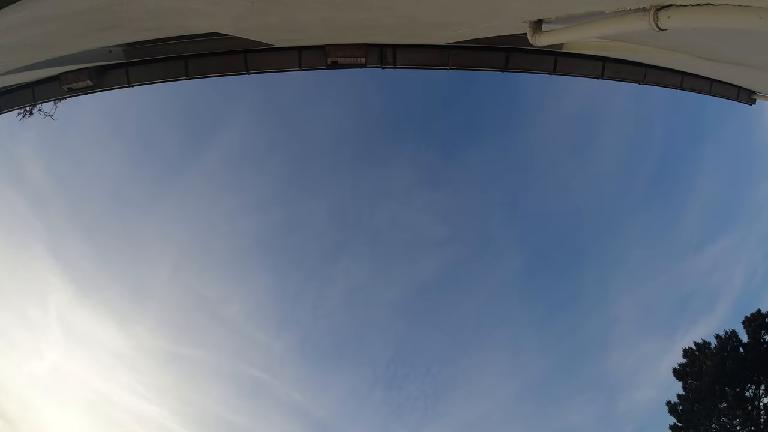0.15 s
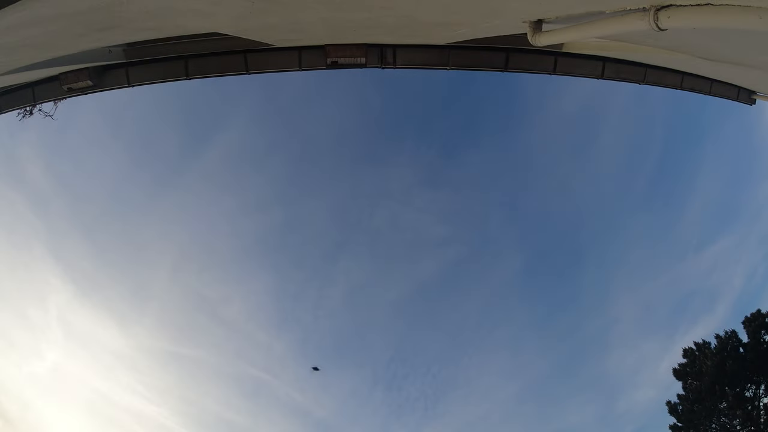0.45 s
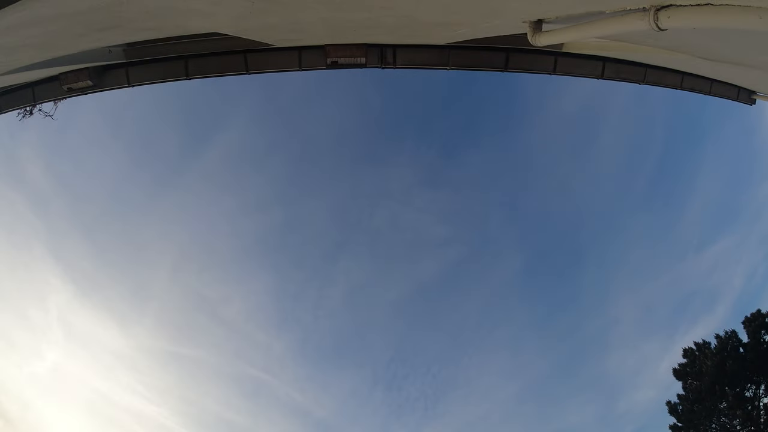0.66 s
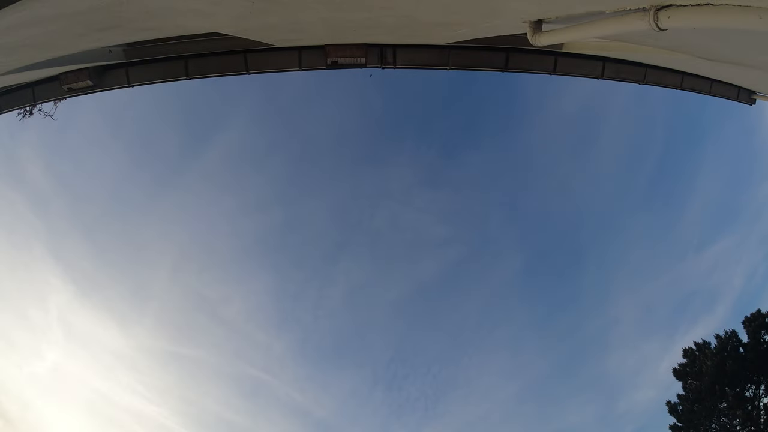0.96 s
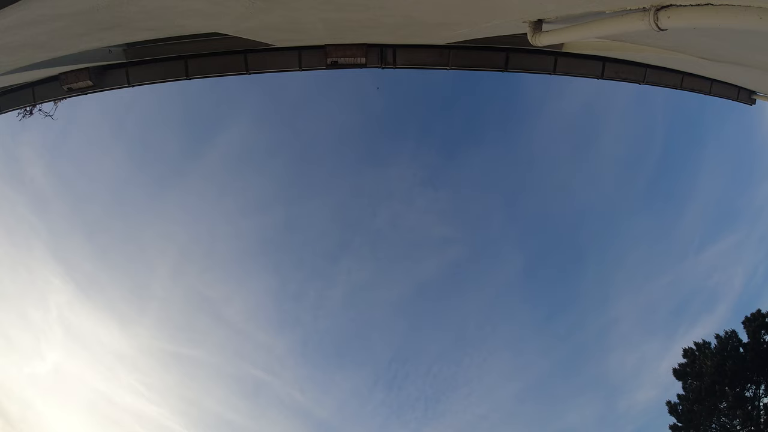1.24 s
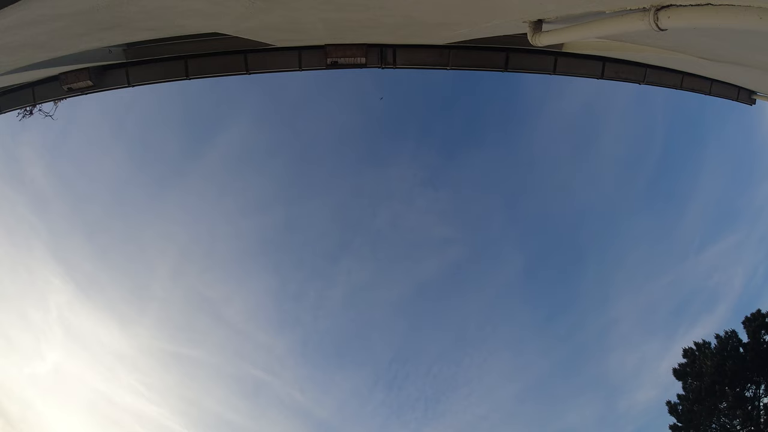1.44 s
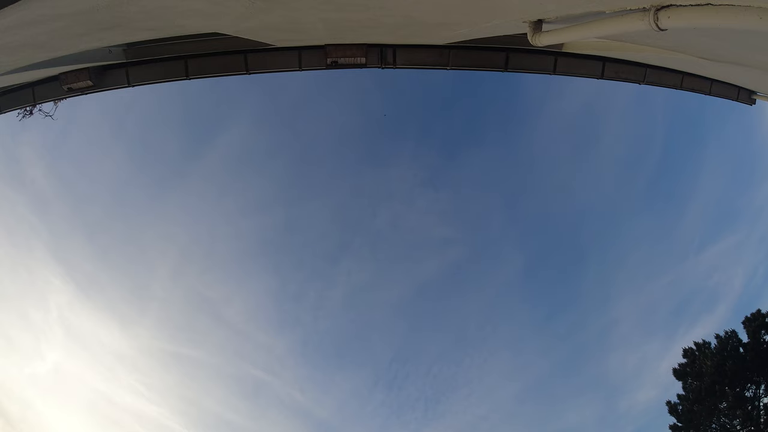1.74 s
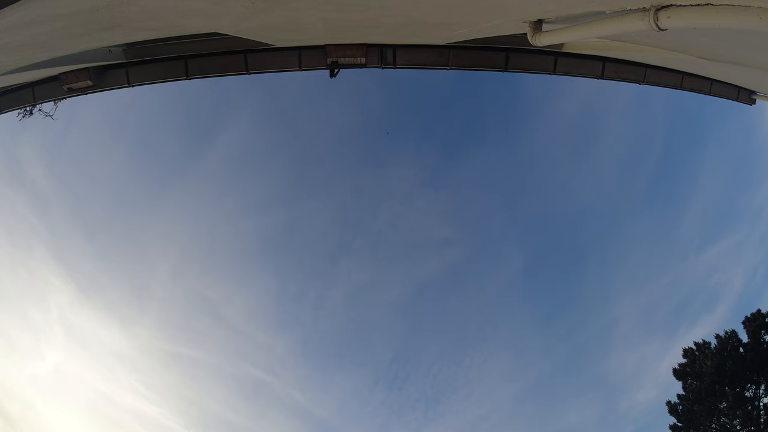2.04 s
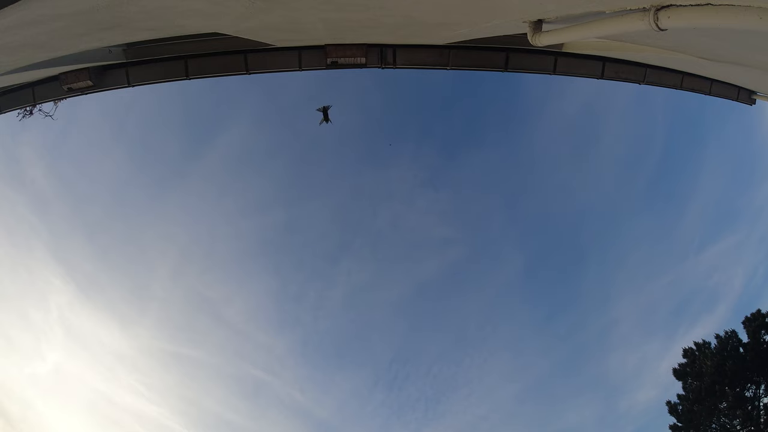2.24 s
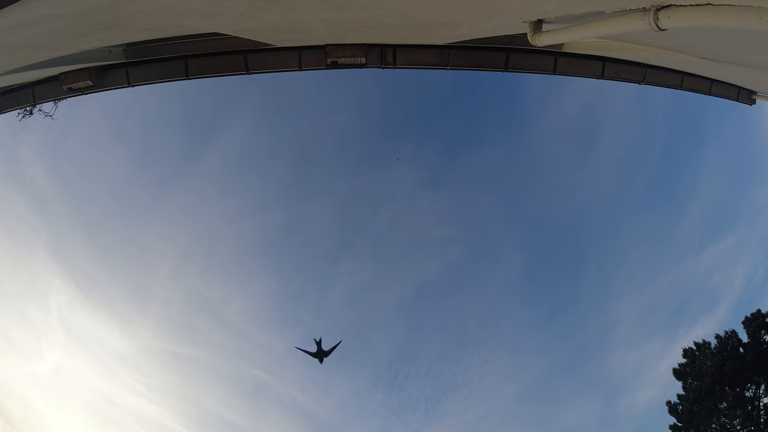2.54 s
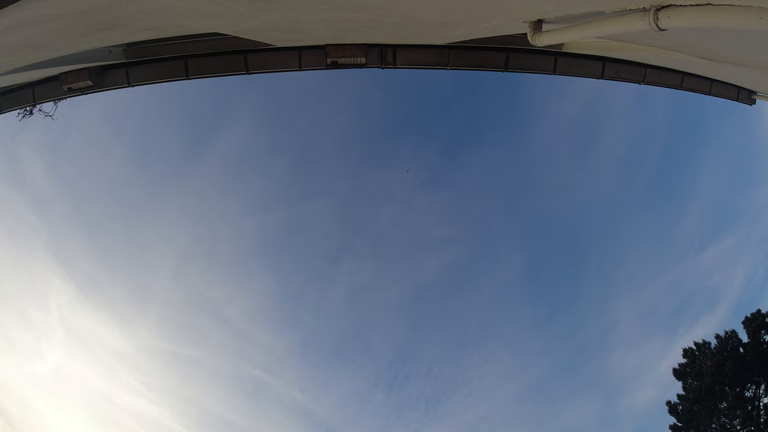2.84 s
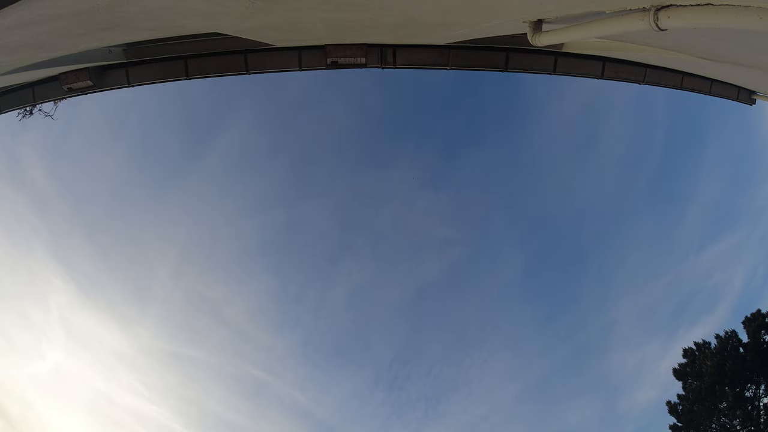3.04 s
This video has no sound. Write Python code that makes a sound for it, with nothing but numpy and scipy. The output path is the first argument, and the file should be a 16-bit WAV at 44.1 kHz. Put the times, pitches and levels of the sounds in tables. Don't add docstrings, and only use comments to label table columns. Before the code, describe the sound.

Small birds whistle, chirp and give thin calls in a quiet yard over faint distant rumble.

```python
import sys
import numpy as np
from scipy import signal
from scipy.fft import rfft, irfft, next_fast_len
from scipy.io import wavfile
from scipy.ndimage import uniform_filter1d

SR = 44100
rng = np.random.default_rng(int(sys.argv[2]) if len(sys.argv) > 2 else 0)


def voltage_ratio(level):
    return 10 ** (np.asarray(level, float) / 20)


def pcm_store(signal):
    levels = np.round(np.clip(np.atleast_2d(signal), -1, 1) * 32767)
    wavfile.write(sys.argv[1], SR, levels.astype(np.int16).T)


N = 140679


def rms_one(x):
    return x / np.sqrt(np.mean(x ** 2) + 1e-20)


def at_hz(points, hz):
    table = np.array(points)
    return np.interp(np.log(hz), np.log(table[:, 0]), table[:, 1])


def drift(rate):
    r = np.exp(-2 * np.pi * rate / SR)
    return rms_one(signal.lfilter([1], [1, -2 * r, r * r], rng.standard_normal(N + SR))[SR:])


def clock():
    return np.arange(N) / SR


def whistle(start, stop, pitch, level):
    edge_s = .004
    t = clock()
    edge = np.clip(np.minimum(t - start, stop - t) / edge_s + .5, 0, 1)
    phase = 2 * np.pi * np.cumsum(pitch) / SR
    return np.sqrt(2) * edge ** 2 * level * np.sin(phase)


def slur(rows, shift=0, add_db=0):
    s, hz, db = np.transpose(rows)
    t = clock() - shift
    level = voltage_ratio(np.interp(t, s, db) + add_db)
    return whistle(s[0] + shift, s[-1] + shift, np.interp(t, s, hz), level)


def glides(rows):
    return sum(slur([(s, first, db), (s + d, last, db)]) for s, d, first, last, db in rows)


def puffs(rows, width_s, low_hz, high_hz):
    noise = rng.standard_normal((3, N))
    band = signal.butter(4, [low_hz, high_hz], "band", fs=SR, output="sos")
    noise = signal.sosfilt(band, noise[0] + noise[1:])
    bells = sum(voltage_ratio(db) * np.exp(-.5 * ((clock() - s) / width_s) ** 2) for s, db in rows)
    return rms_one(noise) * bells


def air(spectrum, low_hz, high_hz, patchy_db):
    # f/Hz, correlation/1
    likeness = [(60, 0.98), (120, 0.91), (220, 0.85), (450, 0.79), (800, 0.4), (1500, 0.5), (3000, .05),
                (8000, 0.65)]
    out, together = 0, drift(2.8)
    edges = np.geomspace(low_hz, high_hz, int(2 * np.log2(high_hz / low_hz)) + 2)
    white = rng.standard_normal((2, 2, N + SR // 4))
    for k, (low, high) in enumerate(zip(edges, edges[1:])):
        band = signal.butter(2, [low, high], "band", fs=SR, output="sos")
        mid, side = signal.sosfilt(band, white[k % 2])[:, -N:]
        hz = np.sqrt(low * high)
        alike = at_hz(likeness, hz)
        gain = voltage_ratio(at_hz(spectrum, hz) + patchy_db * (together + drift(17)))
        out = out + gain * (np.sqrt(1 + alike) * mid + np.sqrt(1 - alike) * side * [[1], [-1]])
    return rms_one(out)


def traffic_rumble():
    # f/Hz, level/dB per Hz
    rumble = [(18, -30), (30, 5.5), (49, -2), (71, -15.5), (106, -14), (173, -20), (436, -25.5), (538, -41),
              (700, -10.5), (910, -60), (1540, -120)]
    return voltage_ratio(-53.5) * air(rumble, 31, 700, patchy_db=.4)


def breeze():
    # f/Hz, level/dB per Hz
    hiss = [(700, -4.5), (1300, -9), (2500, -11), (4000, -14), (5500, -21.5), (7500, -27), (10000, -39),
            (16000, -40.5)]
    # t/s, level/dB
    freshening = [
        (0, -2.5),
        (1.2, 0),
        (1.599, 1.2),
        (3.19, 0.95),
    ]
    level = voltage_ratio(-68.5 + np.interp(clock(), *np.transpose(freshening)))
    return level * air(hiss, 700, 16000, patchy_db=.3)


def drones():
    # f/Hz, rms level/dB
    engines = [(38, -60), (50, -62.5), (74, -64.5), (100, -64)]
    out = 0
    for hz, db in engines:
        level = voltage_ratio(db + 2.9 * drift(4.5))
        phase = 2 * np.pi * np.cumsum(hz + 5 * drift(3.945)) / SR
        out = out + np.sqrt(2) * level * np.sin(phase)
    return out


def cries():
    # t/s, lead-in level/dB, buzz level/dB, buzz length/s
    calls = [
        (-.012, -42, -44, 0.068),
        (1.968, -43, -44, 0.085),
    ]
    lead_s, lead_hz, lead_low_db = .03, 4000, -8
    buzz_hz, start_hz, climb_s, overtone_db = 3004, 2200, 0.00802, -27
    beat_hz, swing_hz, throb_db, fade_db_per_s = 95, 260, 0.5, 98
    upper_hz, upper_db = 470, -3
    t, out = clock(), 0
    wander_hz = 150 * drift(180)
    rough = voltage_ratio(2.5 * drift(200))
    for s, lead_db, buzz_db, d in calls:
        b = s + lead_s
        out = out + whistle(s, b, lead_hz + 0 * t, voltage_ratio(lead_db))
        out = out + whistle(s, b, lead_hz / 2 + wander_hz, rough * voltage_ratio(lead_db + lead_low_db))
        left = np.exp(-np.clip(t - b, 0, 1) / climb_s)
        beat = np.cos(2 * np.pi * beat_hz * (t - b))
        steady = buzz_hz + (start_hz - buzz_hz) * left
        pitch = steady + wander_hz + swing_hz * beat
        fade_db = fade_db_per_s * np.clip(t - b - d / 2, 0, 1)
        level = rough * voltage_ratio(buzz_db - 10.0 * left - fade_db)
        out = out + whistle(b, b + d, pitch, level * voltage_ratio(throb_db * beat))
        out = out + whistle(b, b + d, steady + upper_hz, level * voltage_ratio(upper_db))
        out = out + whistle(b, b + d, 2 * pitch, level * voltage_ratio(overtone_db))
    return out


def peeps():
    # t/s, length/s, first f/Hz, last f/Hz, level/dB
    short_calls = [(2.725, .02, 5900, 5300, -62), (2.716, .02, 4100, 3700, -50),
                   (2.745, .022, 3700, 3950, -52), (2.795, .03, 4100, 4000, -56),
                   (2.74, .015, 6800, 6200, -70), (0, .01, 5000, 4500, -44), (.012, .012, 5300, 4300, -50),
                   (.028, .012, 5200, 4000, -52), (2.7, .014, 4600, 5100, -53),
                   (2.893, .006, 3400, 2200, -62), (.092, .025, 3400, 3300, -49)]
    return glides(short_calls)


def singer():
    # t/s, f/Hz, level/dB
    dip = [(0.78, 2030, -68), (0.796, 1920, -52), (0.816, 1620, -52.5), (0.87, 1456, -58),
           (0.928, 1668, -52), (0.948, 1685, -46), (0.984, 1736, -48.5), (1.0, 1754, -57.5)]
    rise = [(1.09, 1804, -64), (1.128, 1830, -45.5), (1.141, 1843, -55.5), (1.15, 1870, -50),
            (1.184, 1898, -52.5), (1.194, 1962, -59.5), (1.24, 2086, -50), (1.286, 2190, -54.5),
            (1.294, 2195, -41), (1.361, 2298, -42), (1.419, 2318, -38), (1.431, 2320, -61.5)]
    lift = [
        (1.909, 1710, -67),
        (1.924, 1781, -56),
        (1.951, 1912, -59.5),
        (1.994, 2060, -43.5),
    ]
    hook = [
        (2.005, 1869, -75),
        (2.011, 1776, -47),
        (2.032, 1460, -54),
        (2.06, 1450, -49),
        (2.097, 1468, -49),
        (2.109, 1316, -57.5),
    ]
    fall = [(2.155, 2892, -57), (2.163, 2746, -42), (2.191, 2283, -40.5), (2.211, 2165, -39),
            (2.23, 2195, -54), (2.241, 2300, -41), (2.252, 2280, -52), (2.288, 2262, -36.5),
            (2.315, 2227, -50.5)]
    # t/s, f/Hz, level/dB
    arch = [
        (.255, 2850, -72),
        (.3, 3060, -67),
        (.32, 2950, -69),
        (.337, 2350, -73),
    ]
    # t/s, f/Hz, level/dB
    droop = [
        (0.486, 2100, -84),
        (0.513, 2220, -60.5),
        (.55, 2205, -52),
        (0.564, 2085, -60.5),
        (0.583, 1710, -55),
    ]
    # t/s, length/s, first f/Hz, last f/Hz, level/dB
    short_notes = [(.122, .05, 2400, 2000, -54), (.735, .015, 2400, 2600, -66.5),
                   (1.147, 0.046, 5050, 5030, -56.5), (1.41, 0.077, 8150, 8000, -76.5),
                   (2.092, .03, 1950, 1300, -49), (2.135, .04, 1850, 1600, -54),
                   (2.228, .012, 1800, 1800, -54.5), (2.25, 0.0058, 3600, 1300, -49),
                   (1.523, 0.0071, 3500, 3600, -49.5), (1.535, 0.0075, 4300, 4100, -50),
                   (.001, 0.039, 2400, 2700, -54), (1.985, .02, 2300, 2500, -44.5),
                   (.06, .03, 1650, 1600, -62.5), (.04, .03, 2400, 2000, -53)]
    # t/s, centre f/Hz, level/dB, depth of each down-stroke f/Hz
    trill = [
        (1.525, 2885, -54, 800),
        (1.567, 2773, -39, 925),
        (1.597, 2830, -41.5, 516),
        (1.618, 2706, -44.5, 155),
        (1.644, 2350, -43.5, 50),
    ]
    stroke_s, gap_depth = .0135, .9
    out = sum(slur(rows) for rows in (dip, rise, lift, hook, fall, arch, droop))
    out += glides(short_notes)
    s, hz, db, depth_hz = np.transpose(trill)
    t = clock()
    stroke = (t - s[0]) / stroke_s % 1
    depth = np.interp(t, s, depth_hz)
    gap = 1 - gap_depth * depth / depth.max() * np.cos(np.pi * (stroke + 0.016)) ** 2
    pitch = np.interp(t, s, hz) + depth * (.5 - stroke)
    return out + whistle(s[0], s[-1], pitch, gap * voltage_ratio(np.interp(t, s, db)))


def ticks():
    # t/s, peak level/dB
    clicks = [(.002, -63), (1.001, -69), (1.555, -66), (1.811, -64.5), (1.87, -69), (2.108, -51.5),
              (2.43, -69), (2.719, -61)]
    out = np.zeros(N)
    for s, db in clicks:
        out[int(s * SR)] = voltage_ratio(db)
    return signal.sosfilt(signal.butter(2, 8000, "high", fs=SR, output="sos"), out + 1e-18)


def twitter():
    # t/s, length/s, f/Hz, level/dB
    far_notes = [(0.017, 0.043, 7950, -81.5), (1.525, 0.093, 7960, -72), (1.61, 0.056, 5850, -71.5),
                 (2.002, 0.039, 7970, -85.5), (.035, 0.029, 6300, -73), (1.97, .06, 4600, -62.5),
                 (1.96, .08, 5700, -70.5), (1.72, 0.034, 4750, -64), (1.45, 0.057, 2800, -65.5),
                 (1.53, .1, 5200, -71), (2.42, 0.036, 5770, -66)]
    wobble_hz = 130 * drift(70)
    throb = voltage_ratio(4.3 * drift(63))
    return sum(whistle(s, s + d, hz + wobble_hz, throb * voltage_ratio(db)) for s, d, hz, db in far_notes)


def house_knocks():
    # t/s, peak level/dB
    thuds = [
        (.08, -72),
        (.59, -58.5),
        (.79, -66.5),
        (.835, -61.5),
        (2.19, -63),
    ]
    return puffs(thuds, width_s=.012, low_hz=150, high_hz=900)


def sparrow():
    # t/s after the start, f/Hz, level/dB re the chirp
    chirp_up = [(.02, 4000, -21.5), (.027, 4094, -3), (.036, 4704, 1), (.045, 5150, -8.5),
                (.05, 4600, -6.5), (.056, 3700, -8), (.066, 3470, -9.5)]
    chirp_down = [(0.072, 3052, -9), (.08, 4200, -10), (0.091, 3453, -2.5), (.099, 3489, -8),
                  (.106, 3200, -2), (0.118, 3140, -22)]
    # t/s, level/dB
    chirps = [
        (0.926, -48),
        (1.73, -43.5),
        (2.644, -44.5),
    ]
    return sum(slur(part, s, db) for s, db in chirps for part in (chirp_up, chirp_down))


def seeps():
    # t/s, length/s, held f/Hz, drop f/Hz
    calls = [
        (1.445, .05, 4400, 300),
        (2.088, 0.054, 4330, 1188),
        (2.412, 0.1054, 4550, 1112),
        (3.046, 0.079, 4600, 1120),
    ]
    held_db = [-52, -45, -47.5, -49]
    drop_s, drop_db, rasp_hz = .007, 4, 201
    waver_hz, flutter_db = 40, 2.5
    out, hoarse = 0, drift(300)
    waver = rms_one(uniform_filter1d(hoarse, size=300))
    for (s, d, hz, drop_hz), db in zip(calls, held_db):
        left = np.exp(-np.clip(clock() - s, 0, 1) / drop_s)
        pitch = hz + (drop_hz + rasp_hz * hoarse) * left + waver_hz * waver
        out = out + whistle(s, s + d, pitch, voltage_ratio(db + drop_db * left + flutter_db * waver))
    return out


def wing_beats():
    # t/s, peak level/dB
    beats = [(2.36, -60), (2.435, -66), (2.515, -62.5), (2.6, -63), (2.685, -60.5), (2.77, -66.5),
             (2.855, -64), (2.935, -69)]
    return puffs(beats, width_s=.014, low_hz=1150, high_hz=4200)


def yard(x, lag_s, wet_db, t60_s):
    lump_db, lump_s = 1.2, .012
    early_db, early_s = 4.5, .03
    gap_s, alike = 0.0055, 0.36
    t = np.arange(SR) / SR
    lumps = np.interp(t / lump_s, np.arange(200), rng.standard_normal(200))
    grain = rng.standard_normal((3, SR)) * voltage_ratio(lump_db * lumps)
    decay = voltage_ratio(early_db * np.exp(-t / early_s) - 60 * t / t60_s) * (t > gap_s)
    tail = (np.sqrt(alike) * grain[0] + np.sqrt(1 - alike) * grain[1:]) * decay
    tail = voltage_ratio(wet_db) * tail / np.sqrt(np.sum(tail ** 2, axis=1, keepdims=True))
    size = next_fast_len(N + SR)
    port_lag_s = lag_s * np.array([[0], [1]])
    heard = rfft(x, size) * np.exp(-2j * np.pi * np.fft.rfftfreq(size, 1 / SR) * port_lag_s)
    direct = irfft(heard, size)[:, :N]
    echoes = irfft(heard * rfft(tail, size), size)[:, :N]
    return direct + voltage_ratio(1.2 * drift(34)) * echoes


def scene():
    floor = traffic_rumble() + breeze() + drones()
    flutter = voltage_ratio(1.8 * drift(83))
    rasp = voltage_ratio(3.0 * drift(380))
    small = (sparrow() + peeps()) * rasp + twitter()
    birds = yard(singer() * flutter, lag_s=90e-6, wet_db=-7.5, t60_s=.65)
    birds = birds + yard(small, lag_s=100e-6, wet_db=-1.0, t60_s=.42)
    birds = birds + yard(seeps() + cries(), lag_s=100e-6, wet_db=-4.0, t60_s=.38)
    return birds + ticks() + wing_beats() + house_knocks() + floor


def roll_off(x):
    return signal.sosfilt(signal.butter(12, 15700, fs=SR, output="sos"), x)


def record(dry):
    return roll_off(dry)


dry = scene()
out = record(dry)
pcm_store(out)
```